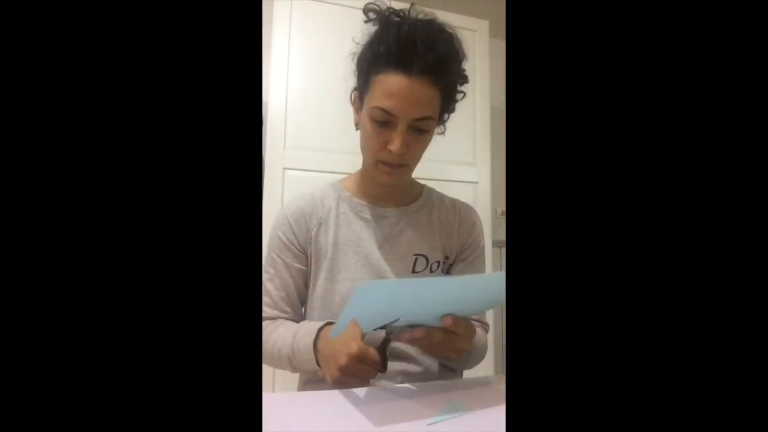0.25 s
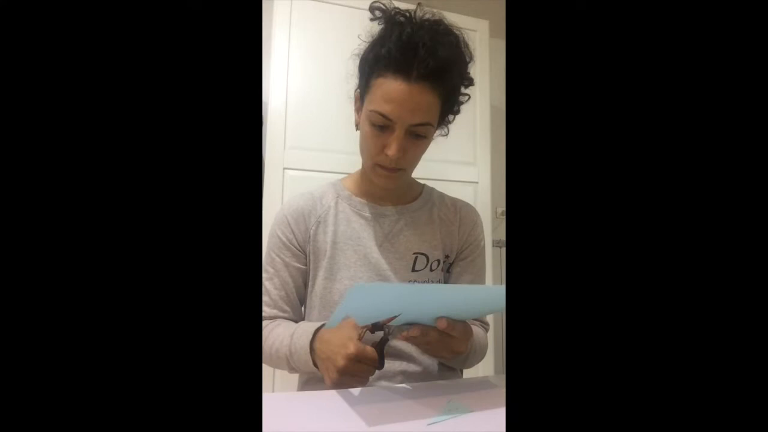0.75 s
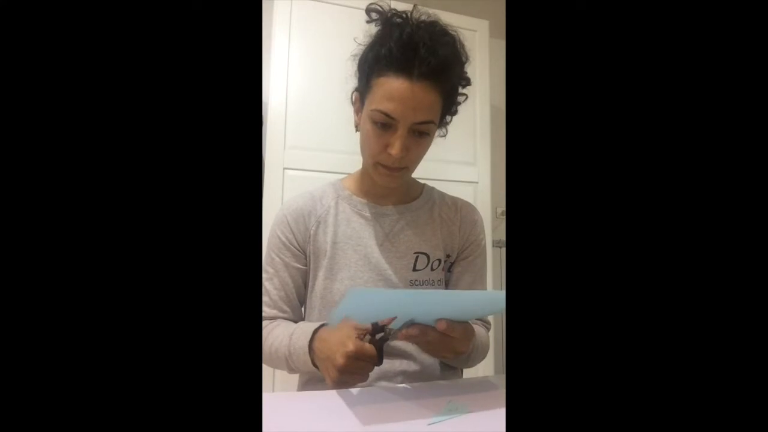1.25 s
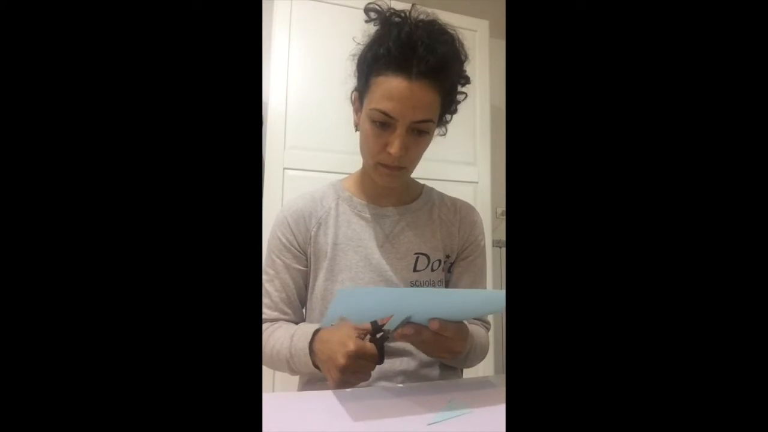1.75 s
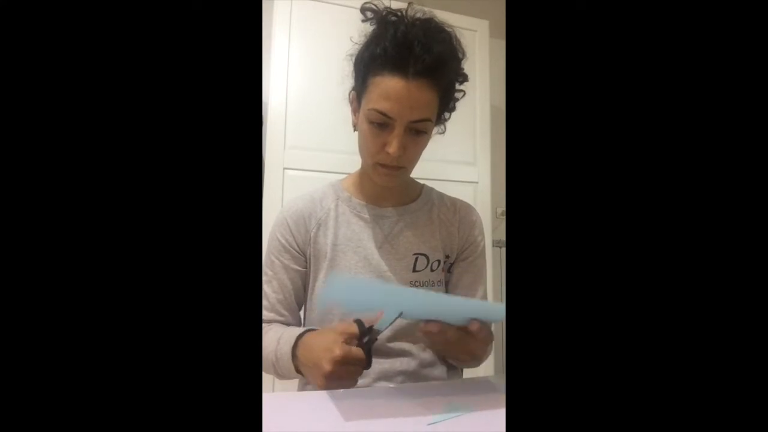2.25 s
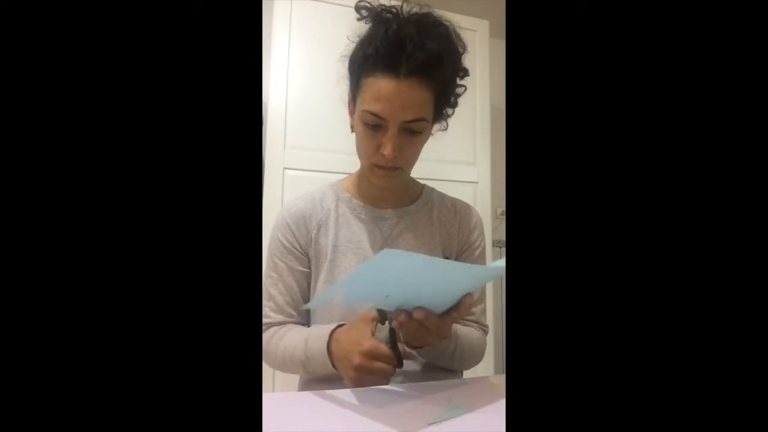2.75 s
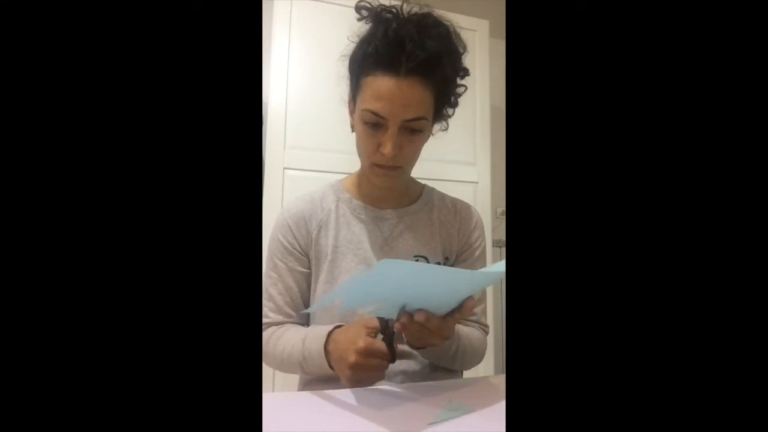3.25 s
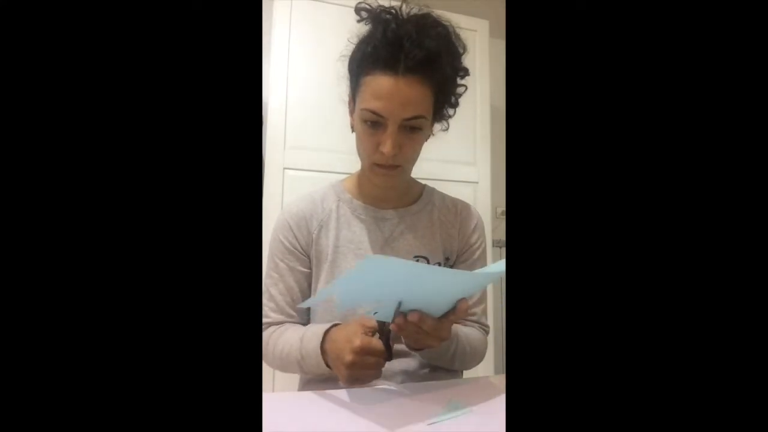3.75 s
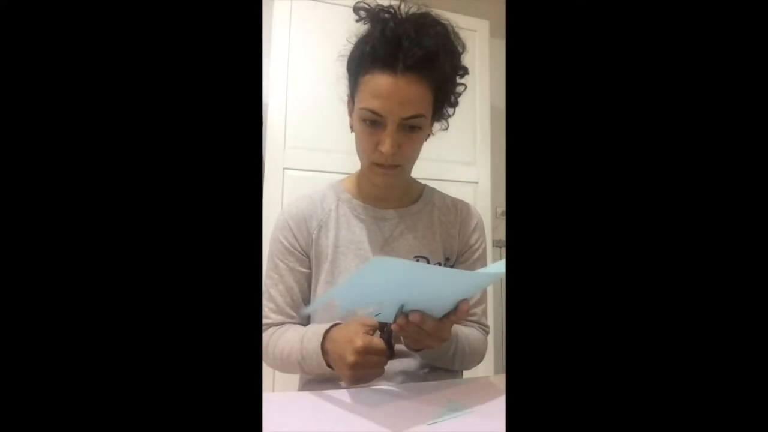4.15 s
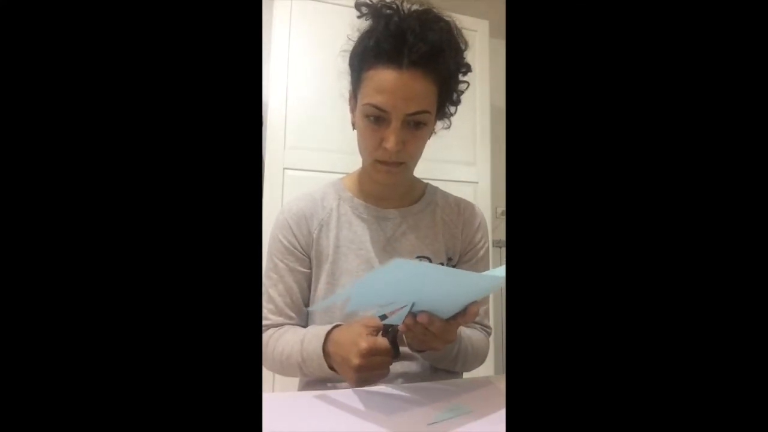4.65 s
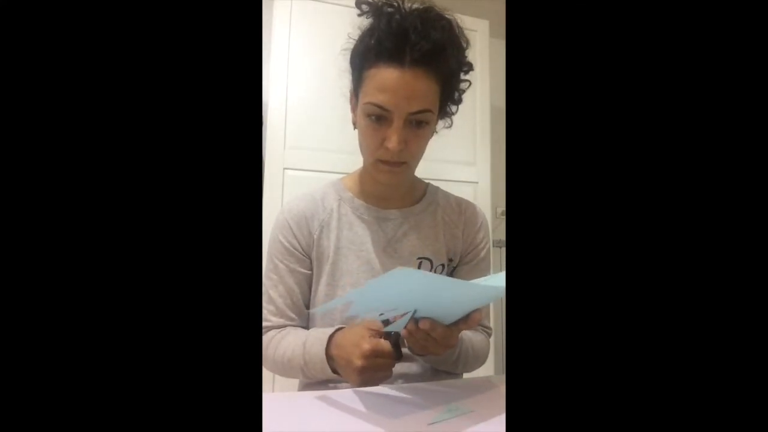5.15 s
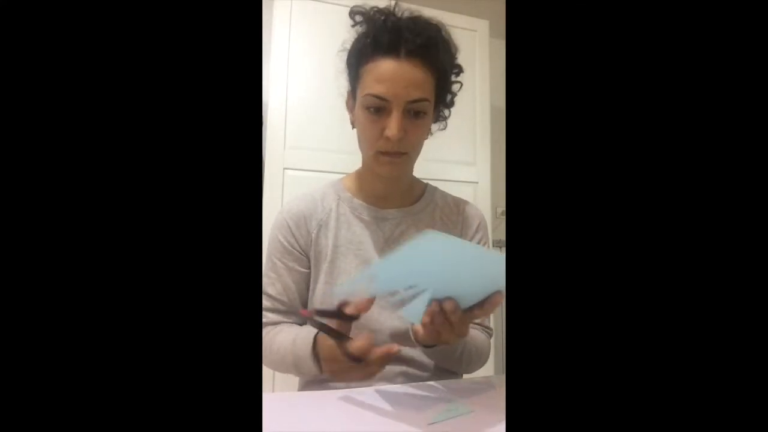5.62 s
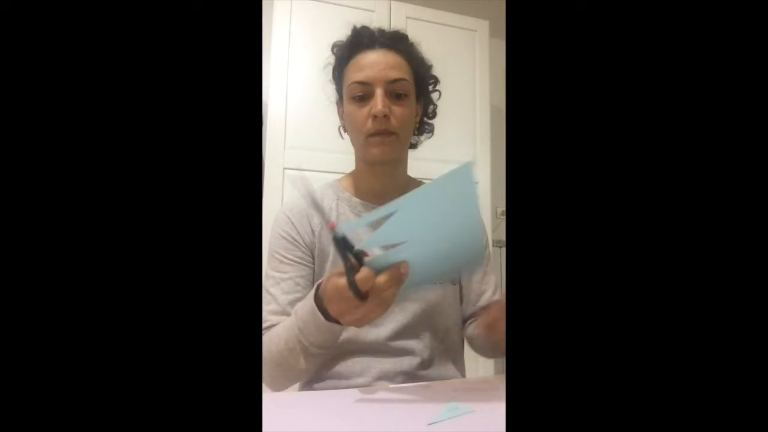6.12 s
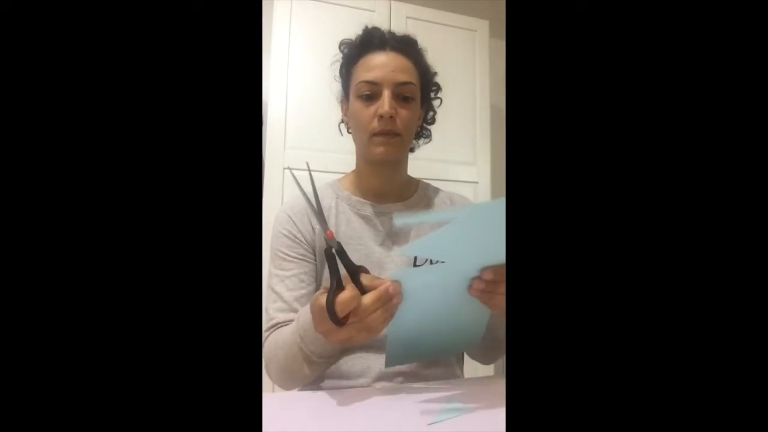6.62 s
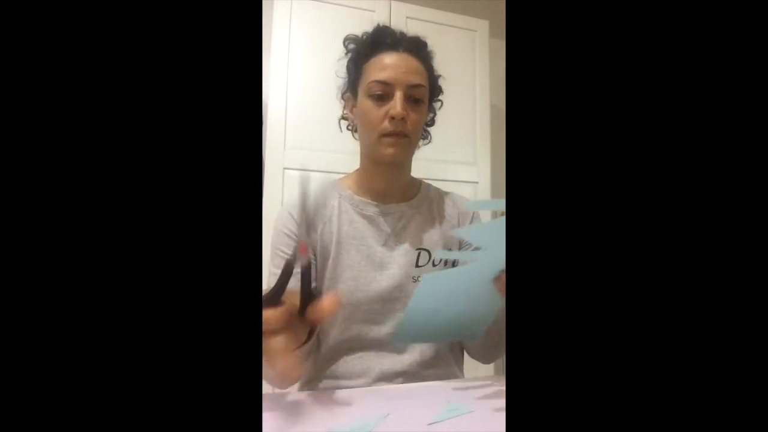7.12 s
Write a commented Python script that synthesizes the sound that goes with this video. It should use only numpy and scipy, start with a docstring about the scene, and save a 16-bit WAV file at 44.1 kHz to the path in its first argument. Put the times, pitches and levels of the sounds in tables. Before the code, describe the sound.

Scissors snip through thin card in short crisp bursts with pauses, then the sheet is handled, flexing and snapping, in a small live room.

```python
"""Scissors through thin card

Scissors cut a sheet of thin card held in the hands above a table in a small, live room.
Each closing stroke is a nearly even run of bites, shaped by the hand's pressure: short bursts of
snapping fibres that sound through the sheet and the blades, while the blades rub the card.
Between strokes the blades slide open along the card, and the sheet is knocked and flexes in the hands;
at the end it is turned over, flexing and snapping. Room reflections and faint air lie around it all."""
import sys
import numpy as np
from scipy import signal
from scipy.fft import rfft, irfft
from scipy.io import wavfile

SR = 44100
rng = np.random.default_rng(int(sys.argv[2]) if len(sys.argv) > 2 else 0)


def inscribe(sig):
    """Save sig as 16-bit PCM at rate SR to the path in sys.argv[1].

    A 1-D sig is mono; a 2-D sig holds one channel per row.
    Samples are clipped to [-1, 1] before scaling.
    """
    pcm = np.round(np.clip(np.atleast_2d(sig).T, -1, 1) * 32767)
    wavfile.write(sys.argv[1], SR, pcm.astype(np.int16))


N = 325458
TIME = np.arange(N) / SR

# Pushes of the closing scissors. Each row: first bite in seconds, last bite in seconds,
# change of pace as a share (+ speeds up, - slows), hardest point from 0 to 1 of the stroke,
# level lost away from that point in dB per whole stroke, bite length in seconds,
# thump, body and crack in dB before fading and trims, rubbing against the bites in dB,
# ring of the sheet in Hz.
STROKES = [(0.992, 1.02, 0, .7, 0, .006, -61, -47, -57, -12, 1150),
           (1.076, 1.162, -.28, .3, 6, .007, -54, -42, -55.5, -9, 1200),
           (1.445, 1.522, .25, .8, 4, .007, -50, -35.5, -47, -11, 910),
           (1.964, 1.997, .1, .1, 4, .007, -44, -35.5, -47, -13, 850),
           (2.375, 2.411, .1, .42, 13, .011, -49, -33.5, -42.5, -4.5, 1060),
           (3.147, 3.218, 0, .95, 3, .012, -60, -47, -56, -4, 1100),
           (3.25, 3.323, -.1, .1, 2, .007, -53, -39, -47.5, -10, 960),
           (3.656, 3.758, .17, .38, 10, .0055, -49, -35.5, -44.5, -14, 1300),
           (4.3575, 4.406, .55, .8, -2, .003, -40, -34.5, -38, -13, 1120),
           (5.494, 5.526, .3, .65, 14, .008, -56, -37, -51, -5, 1020)]
# The sheet snaps, buckles or is knocked by scissors and fingers. Each row: start in seconds,
# length in seconds, thump, body and crack in dB before trims, ring of the sheet in Hz.
KNOCKS = [(1.745, .008, -58, -48, -57, 930), (1.851, .01, -60, -48, -65, 1880),
          (1.874, .003, -68, -39.5, -72, 2250), (2.584, .004, -60, -44, -55, 1050),
          (3.349, .007, -58, -46, -56, 1110), (3.7755, .004, -47, -34, -45, 920),
          (4.059, .0024, -39.5, -44, -52, 1180), (4.2405, .0025, -33.5, -27.5, -37.5, 1150),
          (4.287, .0026, -55, -40.5, -52, 840), (4.884, .0065, -52, -49, -73, 1090),
          (4.998, .005, -53, -53, -64, 985), (5.146, .006, -48, -47.5, -67, 1050),
          (5.169, .004, -46, -37.5, -57, 1050), (5.559, .004, -52, -31, -41, 1280),
          (5.573, .003, -47, -50, -32, 2370), (5.928, .009, -55, -51, -58, 900),
          (6.004, .012, -56, -55, -65, 1190), (6.305, .0022, -50, -45, -75, 1060),
          (6.357, .006, -58, -55, -55, 1050), (6.368, .014, -44, -42.5, -56, 900),
          (6.438, .0055, -54, -46, -55, 930), (6.473, .008, -51, -51, -61, 1030),
          (6.666, .004, -50, -52, -66, 1010), (6.8448, .002, -27.5, -27.5, -31, 970),
          (6.851, .009, -50, -38, -50, 1040), (7.135, .007, -58, -55, -56, 1950),
          (7.1465, .001, -50, -39, -37, 1740), (7.346, .012, -56, -51, -69, 900)]
# The sheet around the cut. Each row: pitch in Hz, width in Hz, relative level in dB.
BODY_MODES = [(982, 210, 2), (1350, 93, 0), (1596, 163, -3.5), (2330, 167, -4)]
# Blades and cut edge. Each row: pitch in Hz, width in Hz, relative level in dB.
CRACK_MODES = [(3500, 620, -3.5), (4304, 330, -2.5), (5620, 520, 1), (6990, 824, -3.5), (8030, 1450, -9.5),
               (12300, 1060, -13), (13900, 2000, -18)]
# Narrow resonances of the room and furniture. Each row: pitch in Hz, width in Hz, relative level in dB.
ROOM_MODES = [(191.9, 4.4, 2), (355, 15, -3.5), (376, 13, -12.5), (560, 23.5, 0.5), (1021.5, 36, -6.5),
              (1117, 23, -0.5), (1234, 42, -12), (1299, 22, 4), (1463, 25, 1.5), (1664, 24, -4),
              (1740, 18, 4), (2157, 9.5, -17), (3705, 15, -17)]


def from_db(db):
    """Decibels to gain."""
    return 10 ** (np.asarray(db) / 20)


def rms_one(x):
    """Scale to rms 1."""
    return x / np.sqrt(np.mean(x ** 2) + 1e-20)


def clipped_normal(size=None):
    """Bell-shaped random values held within two deviations."""
    return np.clip(rng.standard_normal(size), -2, 2)


def at_hz(rows, hz):
    """Read the columns of a table on a log-frequency axis."""
    table_hz, *columns = np.transpose(rows)
    return [np.interp(np.log(hz), np.log(table_hz), column) for column in columns]


def band(x, low_hz, high_hz, order=2):
    """Butterworth band-pass."""
    edges_hz = [low_hz, min(high_hz, SR / 2 - 1000)]
    return signal.sosfilt(signal.butter(order, edges_hz, "band", fs=SR, output="sos"), x)


def resonate(x, modes, stretch=1, alternate=True):
    """Parallel resonances, all shifted by stretch; alternating signs fill the valleys between them."""
    out = 0
    for k, (hz, width_hz, db) in enumerate(modes):
        radius = np.exp(-np.pi * width_hz / SR)
        angle = 2 * np.pi * hz * stretch / SR
        sign = (-1) ** k if alternate else 1
        gain = sign * from_db(db) * (1 - radius * radius) / 2
        poles = [1, -2 * radius * np.cos(angle), radius * radius]
        out = out + gain * signal.lfilter([1, 0, -1], poles, x + 1e-18)
    return out


def add(out, start_s, sound):
    """Mix a sound in at its moment."""
    at = max(round(start_s * SR), 0)
    out[at:at + len(sound)] += sound[:max(N - at, 0)]


def swell(crest, rise, fall, squareness):
    """Speed of one hand movement, a hump that is down to 1/e after rise and fall; gives start and shape."""
    start = max(crest - 2 * rise, 0)
    t = start + TIME[:SR // 2] - crest
    away = np.abs(t) / np.where(t < 0, rise, fall)
    return start, np.exp(-np.minimum(away, 10) ** squareness)


def grip(size, rough_db, slips_hz):
    """Stick and slip: the friction force flutters at rates below slips_hz."""
    low_pass = signal.butter(2, slips_hz, fs=SR, output="sos")
    flutter = rms_one(signal.sosfilt(low_pass, rng.standard_normal(size)))
    return rms_one(from_db(rough_db * flutter))


def fibres(size, per_s, spread_db):
    """Tiny snaps at random moments and of uneven strength, rms 1."""
    born = rng.random(size) < per_s / SR
    polarity = rng.choice([-1, 1], size)
    return rms_one(born * polarity * from_db(spread_db * clipped_normal(size)))


def table_bounce(x, lag_s=.0011, wander=.3, echo_db=-7):
    """The table top sends back a close copy; its delay is drawn anew for each call around lag_s."""
    lag = max(round(lag_s * np.exp(wander * clipped_normal()) * SR), 1)
    return x + from_db(echo_db) * np.pad(x, (lag, 0))[:len(x)]


def air():
    """Faint steady background: shaped noise, coloured further by the room's resonances."""
    # The still room. Each row: frequency in Hz, relative level in dB per Hz.
    air_colour = [(18, -79), (30, -22), (69, -5), (114, -14), (187, -10.5), (315, -12), (443, -12.5),
                  (728, -13.5), (1680, -21.5), (1870, -16.5), (2130, -16.5), (3680, -22.5), (4190, -25.5),
                  (6540, -24), (15500, -35)]
    air_db = -71
    hz = np.maximum(np.fft.rfftfreq(N, 1 / SR), 1)
    db, = at_hz(air_colour, hz)
    noise = irfft(rfft(rng.standard_normal(N)) * from_db(db), N)
    ringing = resonate(noise, ROOM_MODES, alternate=False)
    return from_db(air_db) * rms_one(noise + from_db(8.0) * ringing)


def flexing(flap_width_hz=45, flap_db=7):
    """The bending sheet gives a soft, lumpy flutter, with a resonance at the pitch of its free span."""
    # The sheet bends in the hands. Each row: crest in seconds, rise in seconds, level in dB, flapping in Hz.
    bends = [(0.04, .017, -60.5, 300), (0.96, .07, -59, 370), (1.886, .015, -52, 165),
             (2.174, .02, -53, 170), (2.3, .04, -62, 100), (2.34, .016, -51, 520), (5.505, .02, -55, 290),
             (6.04, .035, -64, 110), (6.385, .028, -52, 160), (6.44, .048, -58, 420),
             (6.864, .025, -58, 85), (6.888, .028, -50, 350), (7.366, .018, -55, 560),
             (7.37, .016, -56, 90)]
    # The whole sheet flapping. Each row: pitch in Hz, width in Hz, relative level in dB.
    flap_modes = [(76, 104, -14.5), (166, 63, -5), (324, 37, -3.5), (583, 270, -12.5)]
    relax_ratio = 1.2  # time to relax over time to bend
    out = np.zeros(N)
    for crest, rise, db, flap_hz in bends:
        start, speed = swell(crest, rise, relax_ratio * rise, squareness=2.0)
        push = rng.standard_normal(len(speed)) * grip(len(speed), rough_db=7, slips_hz=59.5)
        free_span = resonate(push, [(flap_hz, flap_width_hz, flap_db)])
        flutter = speed * band(resonate(push, flap_modes) + free_span, 40, 900)
        level = np.sqrt(np.sum(speed ** 2) / np.sum(flutter ** 2))
        add(out, start, from_db(db) * flutter * level)
    return out


def sliding(ring_width_hz=650, ring_db=4, bend=0.074, trims_db=(0, .5, 1)):
    """Dense fine catches: a rasp from the sheet, a scrape from its edge, a smoother hiss on top."""
    # The blades open along the card, or the fingers shift on it. Each row: crest in seconds,
    # rise in seconds, fall in seconds, card rasp, edge scrape and hiss in dB before trims,
    # ring of the sheet in Hz.
    slides = [(0.064, .012, .045, -60, -61, -64, 1900), (0.202, .058, .019, -49.5, -53, -68, 2250),
              (0.385, .013, .042, -62, -78, -88, 1290), (0.975, .09, .07, -58, -59, -65, 2550),
              (1.332, .04, .04, -53, -59, -62, 1600), (2.05, .05, .08, -60, -75, -91, 1660),
              (2.18, .042, .08, -58, -64, -63.5, 2400), (2.298, .02, .02, -57, -70, -80, 900),
              (2.354, .015, .016, -42.5, -64, -76, 900), (2.625, .04, .025, -55, -57, -70, 2000),
              (2.695, .02, .021, -56, -64, -84, 1400), (3.109, .035, .016, -58, -80, -88, 1600),
              (3.505, .035, .085, -55, -55, -63, 1250), (4.008, .008, .05, -59, -72, -90, 1000),
              (5.471, .05, .016, -57, -56, -60, 2050), (5.558, .024, .022, -44, -52, -52, 1270),
              (5.902, .01, .06, -62, -68, -77, 840), (6.385, .027, .15, -60, -69, -76, 850),
              (6.614, .011, .015, -60, -68, -76, 1080), (6.872, .015, .035, -54, -62, -70, 900)]
    # Steel sliding on steel. Each row: pitch in Hz, width in Hz, relative level in dB.
    steel_modes = [(8390, 1130, 3), (12270, 1600, -1.5), (14500, 2400, -3)]
    out = np.zeros(N)
    for crest, rise, fall, *levels, ring_hz in slides + rubs():
        start, speed = swell(crest, rise, fall, squareness=2.24)
        size = len(speed)
        friction = grip(size, rough_db=3.0, slips_hz=118)
        catches = table_bounce(fibres(size, per_s=5000, spread_db=4) * friction)
        # steel slides more evenly than card
        polish = table_bounce(fibres(size, per_s=9000, spread_db=3) * np.sqrt(friction))
        stretch = np.exp(bend * rng.uniform(-1, 1))
        ring = resonate(catches, [(ring_hz, ring_width_hz, ring_db)])
        rasp = band(resonate(catches, BODY_MODES) + ring, 675, 3000)
        scrape = band(resonate(polish, CRACK_MODES, stretch), 2050, 11500)
        hiss = band(resonate(polish, steel_modes, stretch), 6600, SR / 2)
        for part, db in zip((rasp, scrape, hiss), np.add(levels, trims_db)):
            add(out, start, from_db(db) * speed * rms_one(part))
    return out


def rubs():
    """Friction with the other actions: blades rub through each stroke, each knock brushes the card."""
    # One light brush: rise in seconds, fall in seconds, card rasp, edge scrape and hiss in dB before trims.
    brush = (.008, .024, -62, -73, -88)
    rub_share = .65  # rise and fall as a share of the stroke before and after its hardest point
    runout_s = .012  # added to the fall after the last bite
    hiss_db = -7  # against the scrape
    rows = []
    for first, last, _, hardest, _, _, _, body, crack, rub_db, ring_hz in STROKES:
        crest = first + (last - first) * np.clip(hardest, .1, 1)
        rise = rub_share * (crest - first)
        fall = rub_share * (last - crest) + runout_s
        scrape = crack + rub_db
        rows.append((crest, rise, fall, body + rub_db, scrape, scrape + hiss_db, ring_hz))
    return rows + [(start + length, *brush, ring_hz) for start, length, *_, ring_hz in KNOCKS]


def bites():
    """The card gives way in near-even steps, paced by the hand and shaded by its pressure."""
    gap_s, scatter_db = .0205, 1
    # between two bites a few more fibres tear at a random moment: level and length against the bite
    tear_db, tear_share = -7, .45
    rows = []
    for first, last, hurry, hardest, fade_db, length, thump, body, crack, _, ring_hz in STROKES:
        span = last - first
        for closed in np.linspace(0, 1, round(span / gap_s) + 1):
            start = first + span * closed * (1 + hurry * (1 - closed))
            db = scatter_db * rng.standard_normal() - fade_db * abs(closed - hardest)
            levels = np.add((thump, body, crack), db)
            rows.append((start, length, *levels, ring_hz))
            if closed < 1:
                tear_start = start + rng.uniform(length, gap_s - length / 2)
                rows.append((tear_start, tear_share * length, *(levels + tear_db), ring_hz))
    return rows


def bursts(events, snaps_per_s, spread_db, rise_s, release_s, bend, ring_db, trims_db):
    """Each event is a few milliseconds of snaps into the sheet's sway and bending, its body and the blades."""
    # Slow bending of the sheet. Each row: pitch in Hz, width in Hz, relative level in dB.
    thump_modes = [(223, 140, -13.5), (384, 126, -2), (555, 80, 2)]
    card_q = 5  # card is well damped: pitch over width of its ring
    # the whole sheet is shoved too and pushes a puff of air; its level is against the thump
    puff_hz, puff_width_hz, puff_db = 90, 50, -23
    lead_s = .008  # room for the swell ahead of the event's start
    t = TIME[:SR // 20] - lead_s
    out = np.zeros(N)
    for start, length, *levels, ring_hz in events:
        # each burst swells in on a scale of about a millisecond, lasts its length, then dies quickly
        onset = 1 / (1 + np.exp(-t / rise_s))
        envelope = onset * np.exp(-np.maximum(t - length, 0) / release_s)
        force = table_bounce(fibres(len(t), snaps_per_s, spread_db) * envelope)
        # the body resonances shift as the sheet bends; its free span adds a ring
        stretch = np.exp(bend * clipped_normal())
        ring = resonate(force, [(ring_hz, ring_hz / card_q, ring_db)])
        thump = band(resonate(force, thump_modes), 140, 720)
        body = band(resonate(force, BODY_MODES, stretch) + ring, 530, 2720, order=3)
        crack = band(resonate(force, CRACK_MODES), 2770, SR / 2)
        puff = band(resonate(force, [(puff_hz, puff_width_hz, 0)]), 30, 200)
        thump_db, body_db, crack_db = np.add(levels, trims_db)
        parts = (puff, thump, body, crack)
        for part, db in zip(parts, (thump_db + puff_db, thump_db, body_db, crack_db)):
            # energy grows with the event's length
            level = from_db(db) * np.sqrt(length * SR / np.sum(part ** 2))
            add(out, start - lead_s, level * part)
    return out


def cutting():
    """Bites and tears of the strokes: snapping fibres with a short release."""
    return bursts(bites(), snaps_per_s=3000, spread_db=4, rise_s=0.00084, release_s=0.00099,
                  bend=0.07, ring_db=2, trims_db=(-1.2, -.6, -.3))


def knocking():
    """Snaps and knocks of the sheet: denser, more even bursts with a stronger ring and longer release."""
    return bursts(KNOCKS, snaps_per_s=4000, spread_db=1, rise_s=0.00068, release_s=0.0016,
                  bend=0.11, ring_db=5, trims_db=(-.6, -.6, -.3))


def room(x, build_s=0.001, first_s=0.0045, ring_db=0):
    """Diffuse reflections that die band by band, and a few resonances that ring on."""
    # Reverberation. Each row: frequency in Hz, time to fall by 60 dB in seconds,
    # level against the direct sound in dB.
    reverberation = [(100, 0.23, -7), (432, 0.29, -3.5), (930, 0.32, -9), (2110, 0.34, -4),
                     (3900, 0.26, -4.5), (7800, 0.43, -20), (14500, 0.15, -6.5)]
    t = TIME[:SR * 3 // 4]
    build = 1 - np.exp(-np.maximum(t - first_s, 0) / build_s)
    edges_hz = np.geomspace(60, 17000, num=25)
    response = 0
    for low, high in zip(edges_hz, edges_hz[1:]):
        t60, db = at_hz(reverberation, np.sqrt(low * high))
        noise = band(rng.standard_normal(len(t)), low, high, order=3)
        tail = noise * np.exp(-np.log(1000) * t / t60) * build
        level = np.sqrt(2 * (high - low) / SR / np.sum(tail ** 2))
        response = response + from_db(db) * tail * level
    diffuse = signal.fftconvolve(x, response)[:N]
    return diffuse + from_db(ring_db) * resonate(x, ROOM_MODES, alternate=False)


def scene():
    """Cutting and handling, heard across the table."""
    direct = flexing() + sliding() + cutting() + knocking()
    return (direct + room(direct) + air())[None]


def record(dry):
    """The top is cut steeply."""
    cutoff_hz = 15900
    low_pass = signal.ellip(10, .2, 70, cutoff_hz, fs=SR, output="sos")
    return signal.sosfilt(low_pass, dry)


dry = scene()
out = record(dry)
inscribe(out)
```